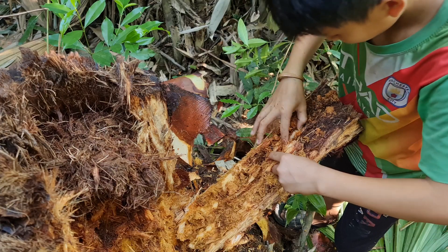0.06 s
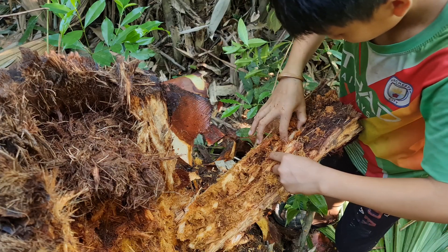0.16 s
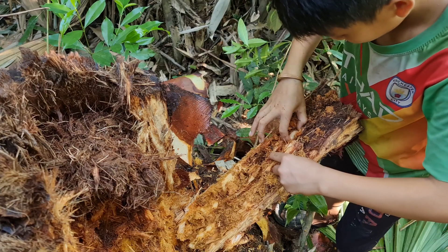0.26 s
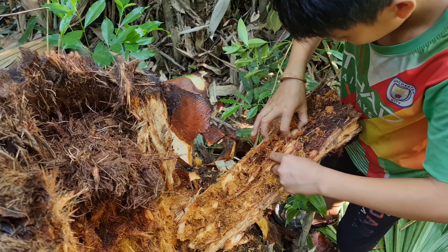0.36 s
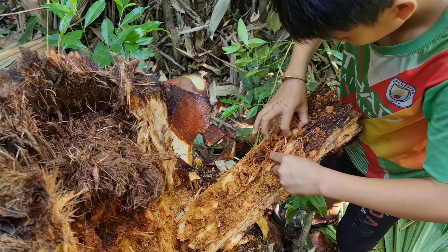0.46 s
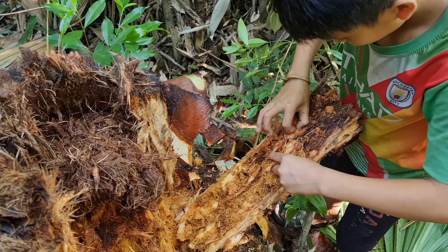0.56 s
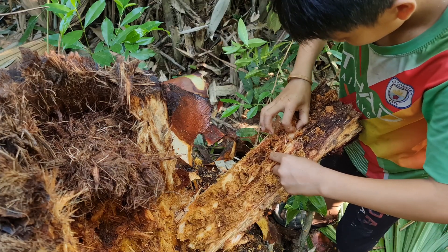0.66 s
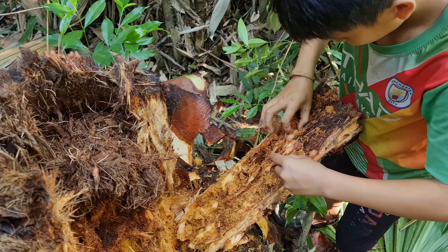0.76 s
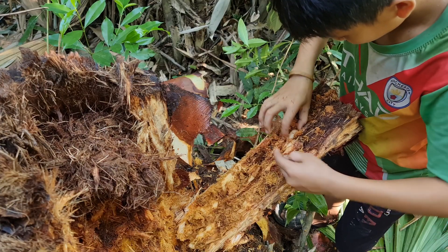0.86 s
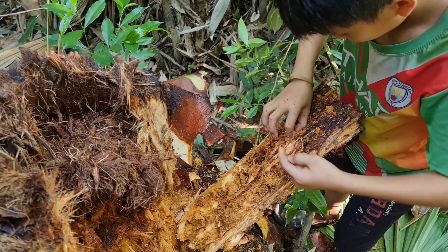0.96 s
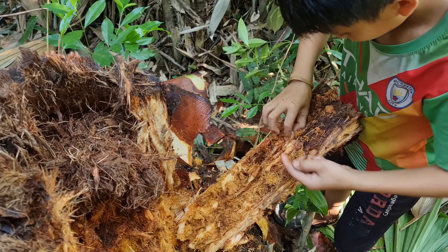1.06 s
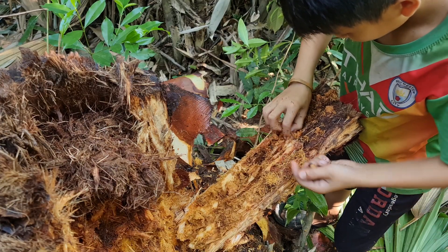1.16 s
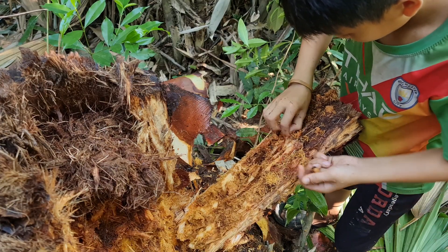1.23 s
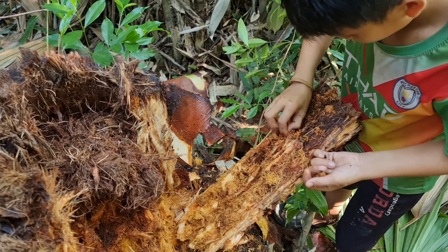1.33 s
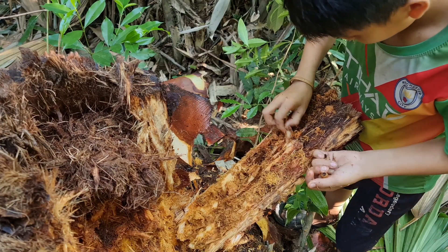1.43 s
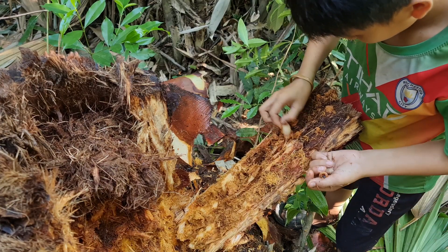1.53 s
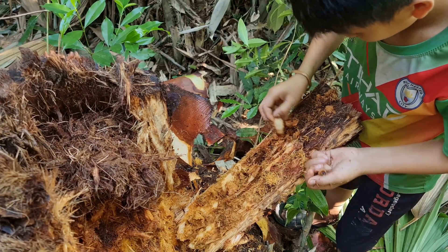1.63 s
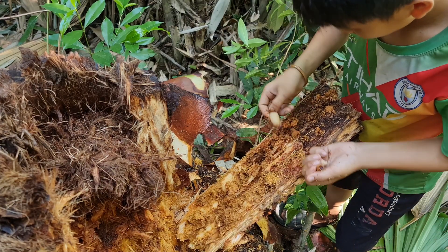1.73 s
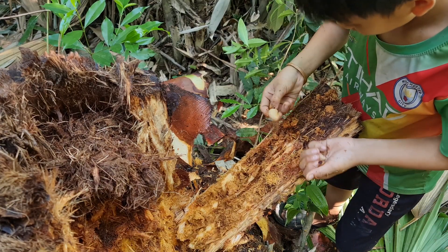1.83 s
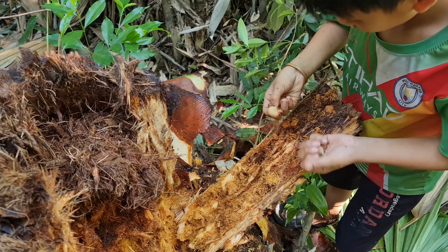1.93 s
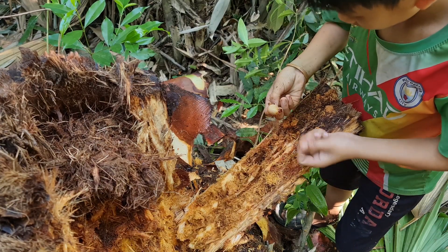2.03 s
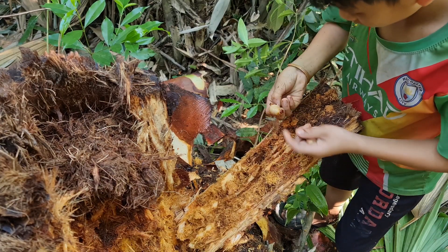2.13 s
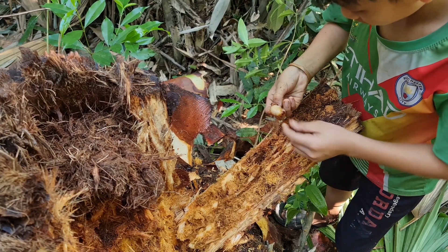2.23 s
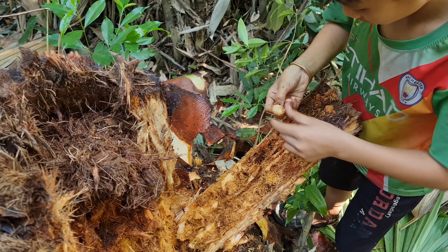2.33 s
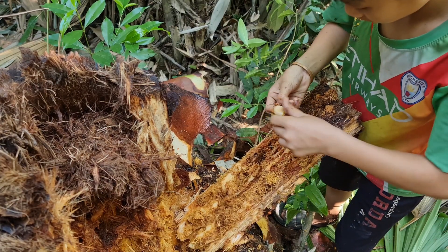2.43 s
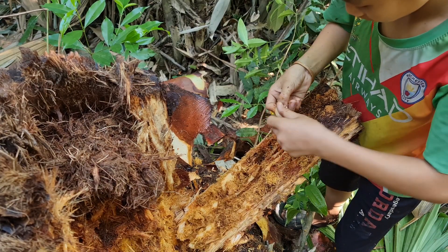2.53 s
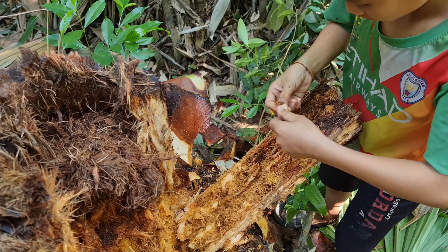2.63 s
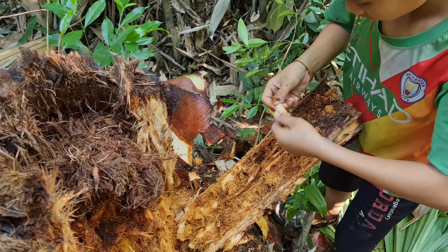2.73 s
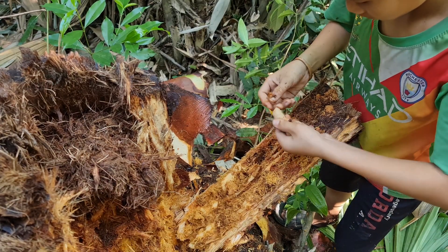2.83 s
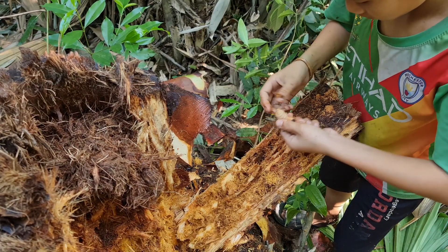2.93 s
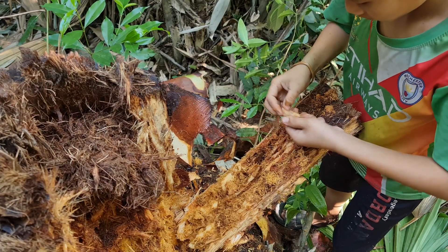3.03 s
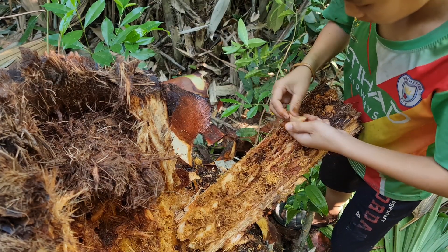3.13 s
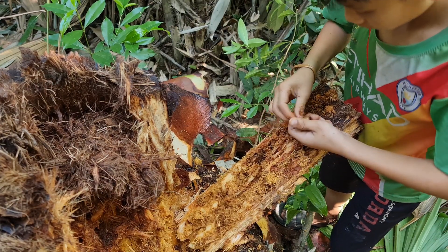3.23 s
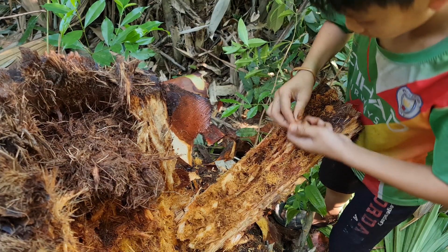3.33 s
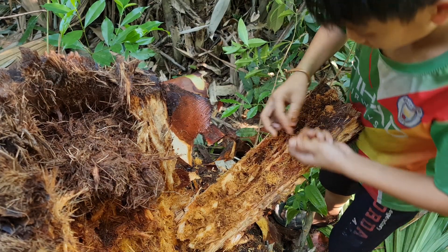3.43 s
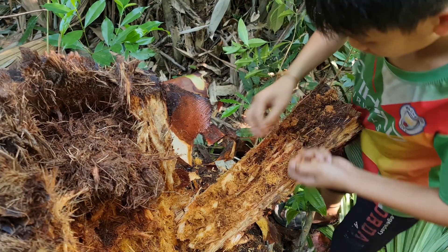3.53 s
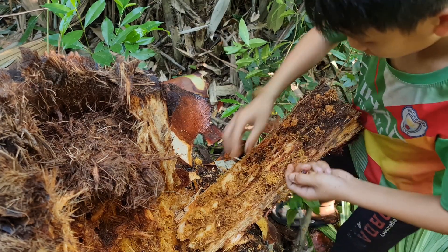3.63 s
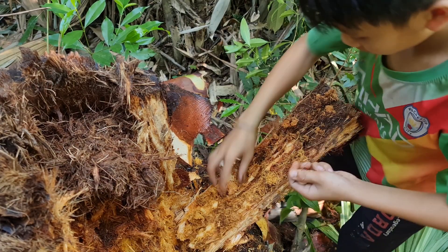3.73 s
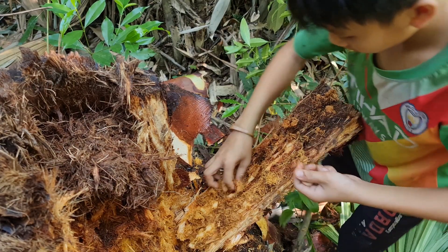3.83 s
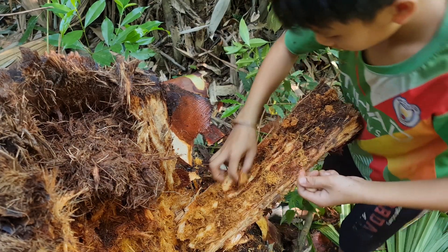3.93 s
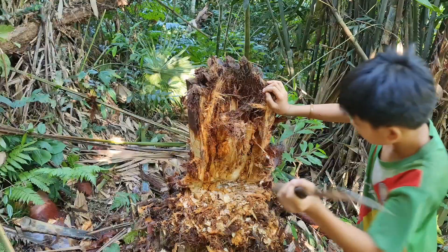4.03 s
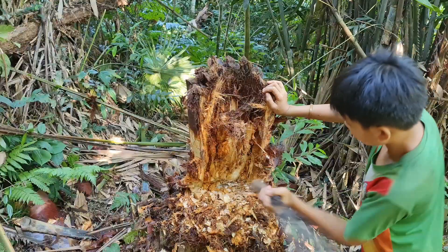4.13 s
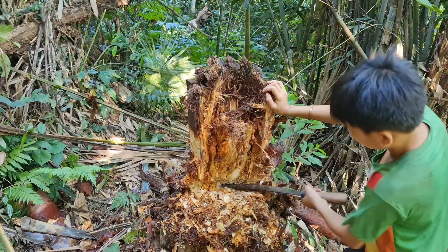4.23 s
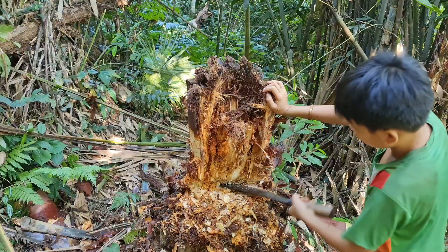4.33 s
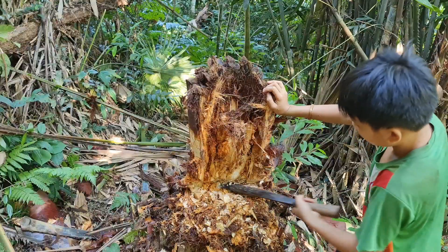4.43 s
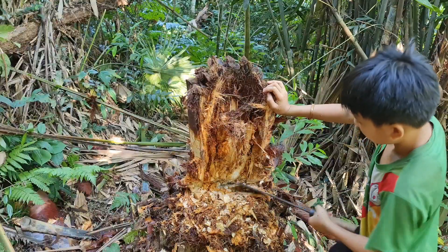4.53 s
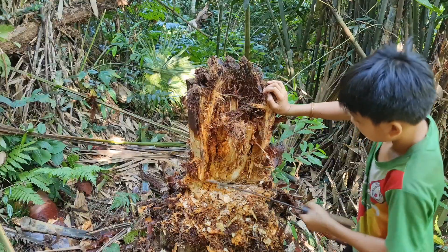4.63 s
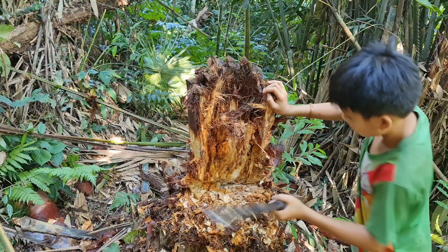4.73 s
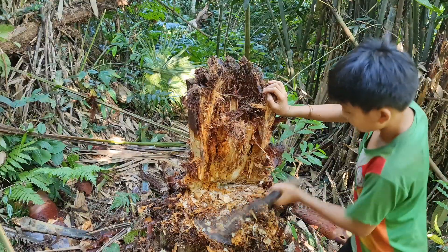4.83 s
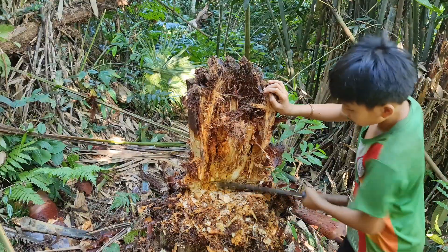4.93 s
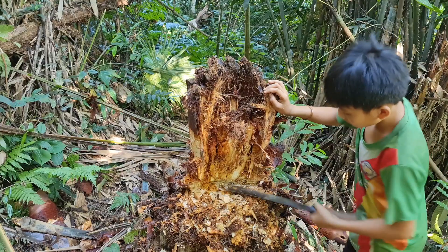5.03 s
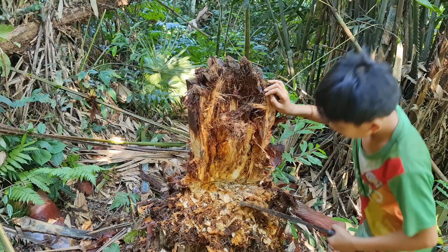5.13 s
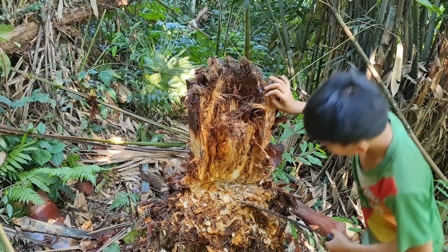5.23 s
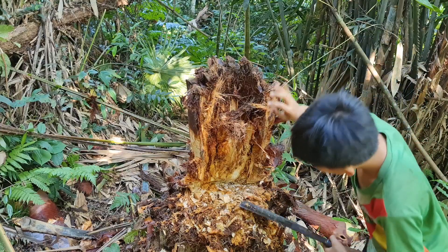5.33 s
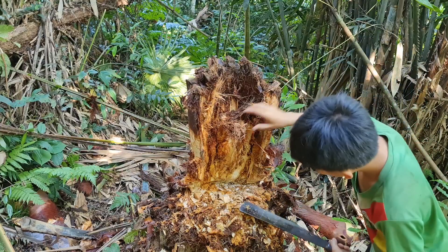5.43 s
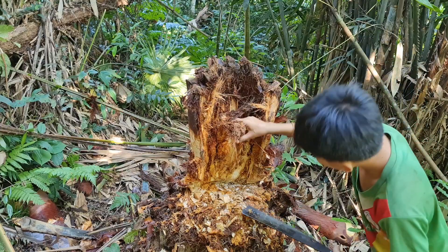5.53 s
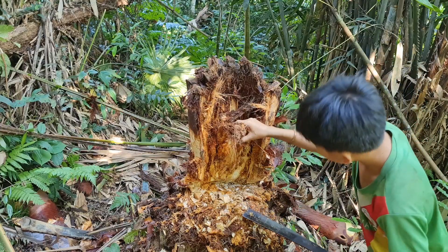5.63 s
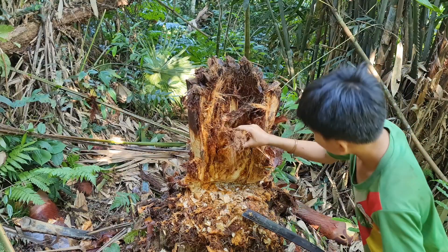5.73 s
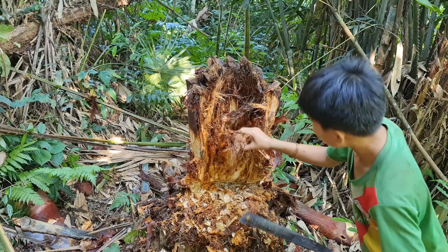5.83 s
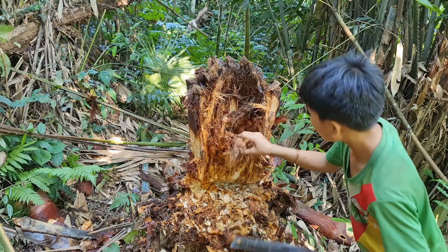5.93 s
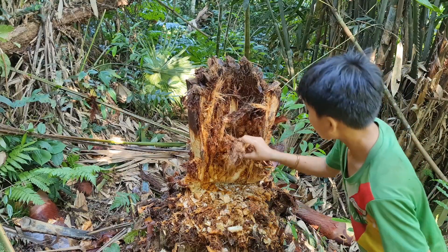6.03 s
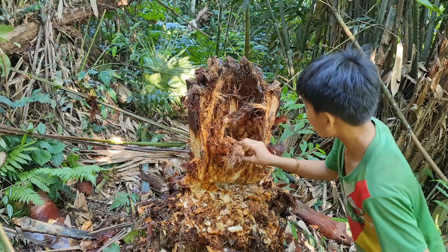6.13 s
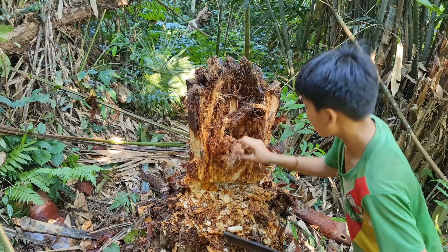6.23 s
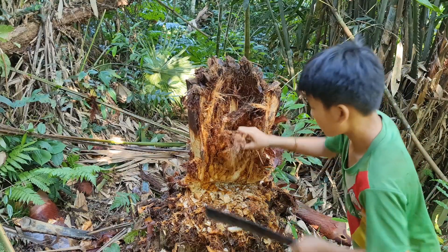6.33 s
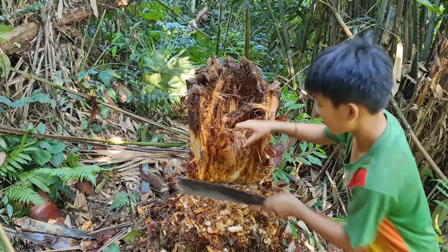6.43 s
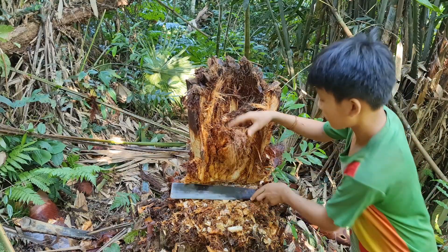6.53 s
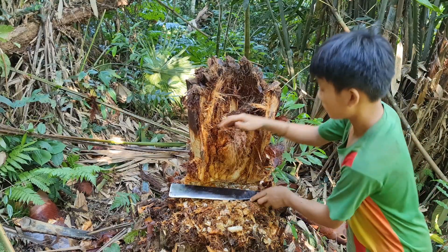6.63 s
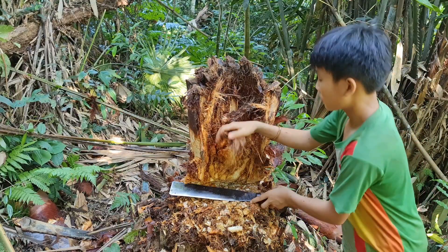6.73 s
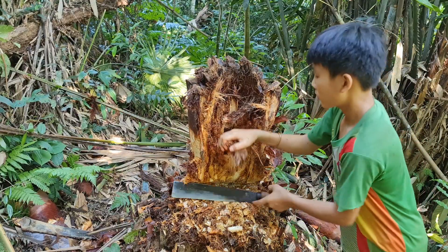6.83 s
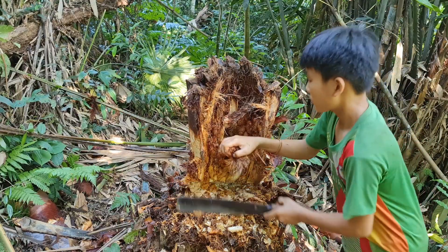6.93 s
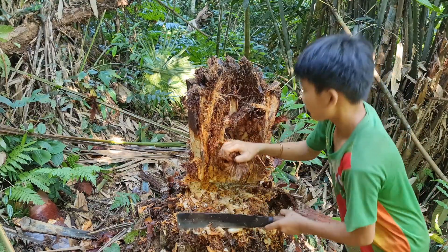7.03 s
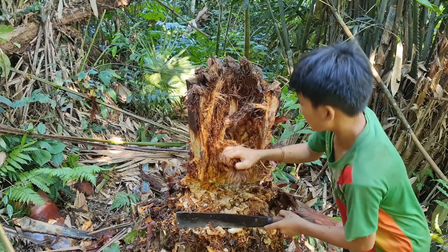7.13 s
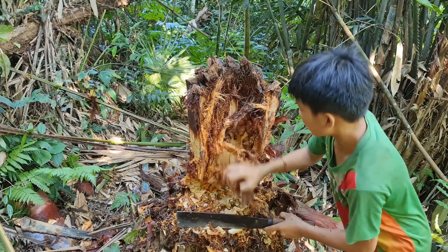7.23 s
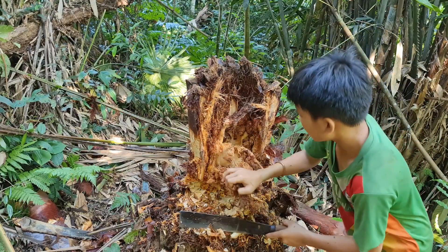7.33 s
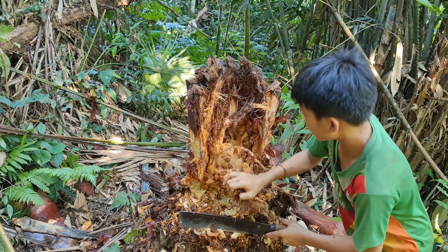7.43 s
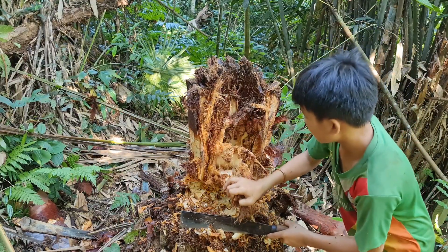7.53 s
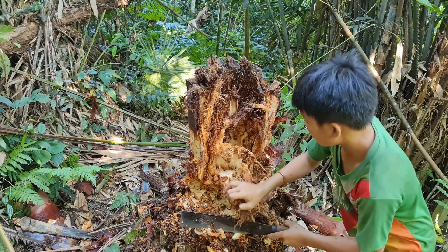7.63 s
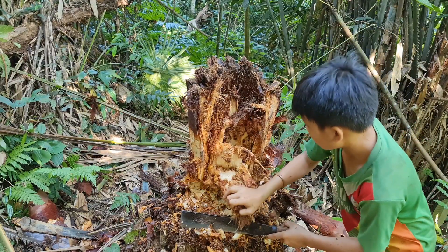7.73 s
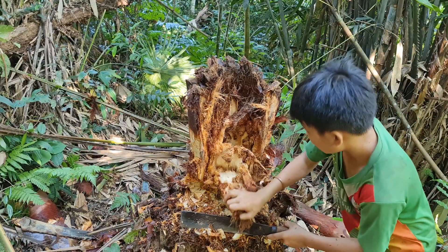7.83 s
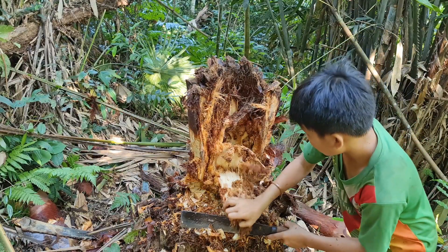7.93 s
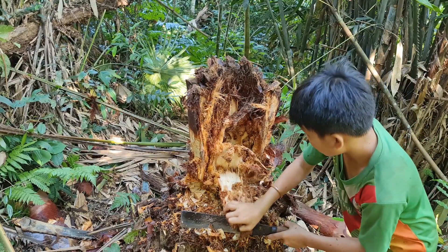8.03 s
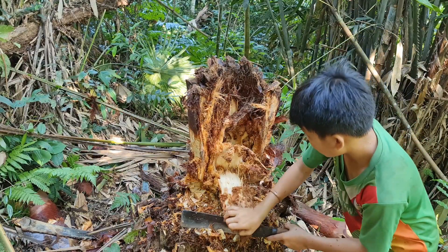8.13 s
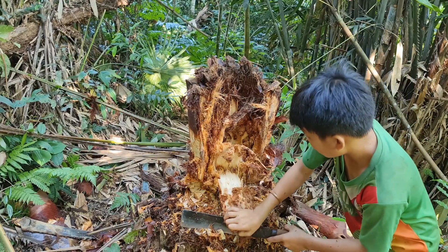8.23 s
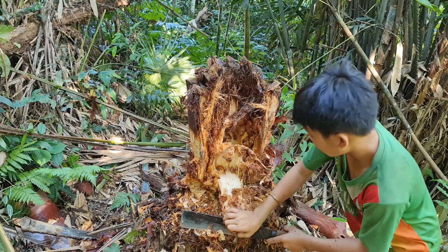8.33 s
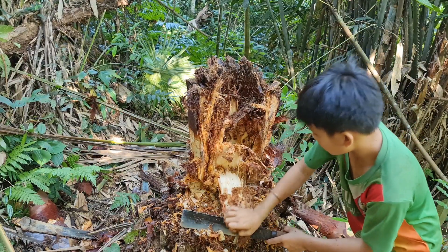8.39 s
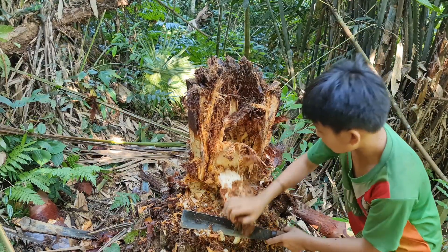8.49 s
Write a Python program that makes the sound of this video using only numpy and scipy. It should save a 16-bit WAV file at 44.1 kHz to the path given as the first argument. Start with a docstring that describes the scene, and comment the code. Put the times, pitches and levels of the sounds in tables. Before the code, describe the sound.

Outdoors in a forest, a steady high insect drone with a fast pulsing rasp. Faint ticks and rustles of fingers in rotten wood come first. The background then shifts abruptly, with a faint low engine far off. A blade chops hard, squeaks briefly and chops again, crumbs falling. Light touches and a small clink follow, then fibres crackle and snap as they are torn out. Close stereo microphone, work slightly right.

```python
"""Tearing a palm trunk open in a humming forest

Insects drone while someone picks at a rotten, fibrous palm trunk: coloured noise, part of it pulsing.
At a second spot a far engine hums (three harmonics) and a bird whistles once (a gliding tone).
A machete chops (a noise burst), squeaks once in the damp wood, chops again, and later clinks
(ringing modes). Then a hand tears pith away: noise grains and bursts crackle and snap, and the
soft wood answers with dull knocks made of dying sine waves."""
import sys
import numpy as np
from scipy import signal
from scipy.fft import rfft, irfft
from scipy.io import wavfile
from scipy.ndimage import uniform_filter1d

SR = 44100
rng = np.random.default_rng(int(sys.argv[2]) if len(sys.argv) > 2 else 0)


def wav_out(sig):
    """Save sig, one row per channel (or a flat mono array), as 16-bit PCM at SR to the path in sys.argv[1]."""
    wavfile.write(sys.argv[1], SR, np.round(np.clip(np.atleast_2d(sig).T, -1, 1) * 32767).astype(np.int16))


N = 377496
T = np.arange(N) / SR  # time, s
FREQS = np.maximum(np.arange(N // 2 + 1) * SR / N, 1)  # Hz, kept above 0 for the logarithm


def undb(db):
    """Turn decibels into a gain."""
    return 10 ** (np.asarray(db) / 20)


def unit(x):
    """Scale to rms 1."""
    return x / np.sqrt(np.mean(x ** 2))


def shape(points):
    """Draw a dB curve over all frequencies through (f/Hz, level/dB) points."""
    hz, db = np.transpose(points)
    return np.interp(np.log(FREQS), np.log(hz), db)


def colour(x, db):
    """Filter with the given dB at every frequency, without sounding ahead of time."""
    cepstrum = irfft(db * np.log(10) / 20, N)
    cepstrum[1:N // 2] *= 2
    cepstrum[N // 2 + 1:] = 0
    response = np.exp(rfft(cepstrum))
    return irfft(rfft(x) * response, N)


def band(x, low_hz, high_hz):
    """Gentle band-pass."""
    edges = [low_hz, min(high_hz, SR / 2 - 100)]
    return signal.sosfilt(signal.butter(2, edges, "band", fs=SR, output="sos"), x)


def add(out, s, x):
    """Mix a short sound in at time s."""
    i = int(s * SR)
    out[..., i:i + x.shape[-1]] += x[..., :N - i]


def walk(rate):
    """Slow random wander with rms 1; rate is new values per second."""
    k = int(SR / rate)
    steps = np.repeat(rng.standard_normal(N // k + 1), k)[:N]
    return unit(uniform_filter1d(steps, k))


def ports(pair, split_hz):
    """Turn two unrelated signals into left and right: alike below split_hz, unlike above."""
    apart = 1 / (1 + (split_hz / FREQS) ** 2) / 2
    mid, side = rfft(pair) * np.sqrt([1 - apart, apart])
    return irfft(np.array([mid + side, mid - side]), N)


def ring(modes, gains, ring_ratio, pitch):
    """A struck thing sounds as several sine waves that die away, each at its own speed."""
    t = T[:SR // 4]
    total = 0
    for (hz, db, t60), gain in zip(modes, gains):
        decay = np.exp(-np.log(1000) * t / (t60 * ring_ratio))
        total = total + gain * undb(db) * np.sin(2 * np.pi * hz * pitch * t) * decay
    return total


def swell(start_s, length_s, attack_s, release_s):
    """Loudness curve that builds up, holds and dies away."""
    early, late = np.maximum(start_s - T, 0), np.maximum(T - start_s - length_s, 0)
    return np.exp(-np.minimum(early / attack_s + late / release_s, 20))


# Tone of the forest air at the first and second spot: f/Hz, relative level/dB per Hz
FIRST_AIR = [(20, -27), (50, -1.5), (100, -12), (160, -25), (330, -14.5), (700, -7.5), (950, -16),
             (1300, -15.5), (2200, -23), (3700, -26.5), (6300, -29), (8500, -25), (10500, -27),
             (16000, -28)]
SECOND_AIR = [(20, -12), (48, 2), (100, 0), (170, -16.5), (330, -10), (600, -3), (900, -14), (1250, -11.5),
              (2200, -19.5), (3700, -22.5), (6300, -23.5), (8500, -23), (10500, -28.5), (16000, -37.5)]


def air(spectrum, db, sway_db):
    """Soft wash of far leaves and rumble: coloured noise with a swaying level."""
    level = undb(db + sway_db * walk(1.9))
    wash = ports(colour(rng.standard_normal((2, N)), shape(spectrum)), split_hz=53)
    return level * unit(wash)


# Tone of the insect song at the first and second spot: f/Hz, relative level/dB per Hz
FIRST_SONG = [(3900, -58), (4250, -16), (4500, 0), (4950, 5), (5300, 2.5), (5550, -9.5), (6100, -43),
              (6900, -23), (7350, -16), (8000, -44)]
SECOND_SONG = [(4000, -40.5), (4450, -19.5), (4800, -4.5), (5050, -1.5), (5300, -2.5), (5550, -14),
               (6100, -32.5), (6900, -23.5), (7450, -19), (8000, -28)]


def insects(song, chorus_db, caller_db, pulse_hz, pan_db, stroke):
    """A far chorus blurs into a band; a nearer insect pulses with its wing strokes, each sounding much the
    same."""
    left_right = np.array([[pan_db], [-pan_db]])
    phase = np.cumsum(pulse_hz * (1 + .006 * walk(4))) / SR % 1
    strokes = unit(np.exp(-((phase - .5) / stroke) ** 2 / 2))  # stroke: width as a share of a cycle
    rasp = rng.standard_normal((2, N))
    repeated = rasp[:, np.round(phase * SR / pulse_hz).astype(int)]
    # the fresh half-strength rasp makes each stroke a little different
    caller = strokes * unit(repeated + rasp / 2) * undb(caller_db + left_right / 2)
    chorus = rng.standard_normal((2, N)) * undb(.3 * walk(2) - left_right / 40)
    db = shape(song)
    return undb(chorus_db) * colour(chorus + caller, db) / np.sqrt(np.mean(undb(db) ** 2))


def high_insect(start_s=2.86, hz=7450, width_hz=480, db=-81):
    """A thinner, higher voice, a narrow band of noise, joins the chorus and holds its note."""
    voice = band(rng.standard_normal((2, N)), hz - width_hz / 2, hz + width_hz / 2)
    return undb(db) * unit(voice) * np.clip((T - start_s) / .2, 0, 1)


# Far engine: t/s, firing rate f/Hz, relative level/dB
ENGINE_PATH = [(3.98, 45.5, -65.5), (4.4, 46.02, -63.5), (5, 47.57, -63), (5.8, 48.3, -65),
               (6.5, 48.4, -66.5), (7.2, 48.6, -72), (8.56, 48.58, -84)]


def engine(gain_db=-1, second_db=-4, third_db=-25):
    """Only the three lowest firing harmonics carry through the trees."""
    seconds, firing_hz, level_db = np.transpose(ENGINE_PATH)
    hz = np.interp(T, seconds, firing_hz)
    db = np.interp(T, seconds, level_db)
    turn = 2 * np.pi * np.cumsum(hz * (1 + 0.0097 * walk(6.7))) / SR
    hum = np.cos(turn) + undb(second_db) * np.cos(2 * turn) + undb(third_db) * np.cos(3 * turn)
    return unit(hum) * undb(gain_db + db + 1.1 * walk(12))


def bird(from_hz=4480, to_hz=3880, db=-80.5, flutter_db=-1.0):
    """One far, falling whistle that flattens out, blurred by the trees."""
    u = np.clip((T - 5.08) / .7, 0, 1)  # starts at 5.08 s, lasts 0.7 s
    glide = (1 - u) ** 1.5
    hz = to_hz + (from_hz - to_hz) * glide + 45 * walk(200)
    loudness = undb(db + flutter_db * walk(24.91)) * np.sqrt(np.abs(np.sin(np.pi * u)))
    return loudness * np.sin(2 * np.pi * np.cumsum(hz) / SR)


def forest(x, near_db=-15, near_t60=0.057, far_db=-35, far_t60=0.54):
    """Ground and stems close by scatter sound at once; the trees beyond leave a faint tail."""
    t = T[:SR]
    near, far = rng.standard_normal((2, 2, SR)) * (t > .001)
    near = band(near, 200, 14000) * np.exp(-np.log(1000) * t / near_t60)
    far = band(far, 900, 3500) * np.exp(-np.log(1000) * t / far_t60)
    echo = (undb(near_db) * unit(near) + undb(far_db) * unit(far)) / np.sqrt(SR)
    return x + signal.fftconvolve(np.broadcast_to(x, (2, N)), echo, axes=1)[:, :N]


def sided(x, hz=350, width_hz=110, shade_db=-6):
    """The trunk throws its low-middle tones more to the right: the left has a dip there."""
    dip = undb(shade_db * np.exp(-((FREQS - hz) / width_hz) ** 2))
    return np.array([irfft(rfft(x) * dip, N), x])


def chips(hz=2300, spread_octaves=0.65, cycles=7, size_db=3, count=5000):
    """A stream of dry chips, each ticking with its own brief pitch."""
    out, t = np.zeros((2, N)), T[:SR // 50]
    times = rng.uniform(0, T[-1], count)
    for s, (tone, size, pan) in zip(times, rng.standard_normal((count, 3))):
        chip_hz = min(hz * 2 ** (spread_octaves * tone), SR / 3)
        tick = np.sin(2 * np.pi * chip_hz * t) * np.exp(-t * chip_hz / cycles)
        add(out, s, undb(size_db * size + 2 * pan * np.array([[1], [-1]])) * tick)
    return unit(out)


def debris(delay_s=0.017, db=-51, fall_s=.028, settle_db=-70, settle_s=0.082):
    """Loudness of the crumbs: a shower falls after each chop, and the last ones trickle slowly."""
    level = np.zeros(N)
    for _, stuck_s, _, _ in CHOP_CUTS:
        level += undb(db) * swell(stuck_s + delay_s, 0, delay_s / 2, fall_s)
        level += undb(settle_db) * swell(stuck_s + delay_s, 0, delay_s / 2, settle_s)
    return level


# Tone of the loose pith: f/Hz, relative level/dB per Hz
PITH_TONE = [(120, -11.5), (260, 3), (500, -3), (1000, -6), (1900, -3.5), (4000, -3), (7000, -2),
             (11000, -7), (16000, -16.5)]
# Strokes of a hand or the blade over loose pith:
# t/s at the height, relative level/dB, half length t/s, body level/dB, treble level/dB
BRUSH_STROKES = [(0.453, -78, 0.11, -11, 1), (2.23, -76.5, 0.075, -16, -12), (2.58, -77.5, 0.068, -10, 0),
                 (3.593, -78.5, 0.087, 19, 7), (3.775, -62.5, 0.095, -2.5, -2),
                 (4.603, -60, 0.029, -13.5, -4), (5.129, -62, 0.033, -6, -12.5)]


def brushing(body_hz=900, treble_hz=4500, debris_body_db=-2, debris_treble_db=-3, chips_db=-6):
    """Loose fibres rub, catch and tick under a moving hand or blade, or as they fall."""
    grains = rng.standard_normal((2, N))
    catches_db = 3.6 * np.minimum(rng.exponential(size=N), 6.5) + 2.8 * walk(110)
    rubbing = unit(ports(colour(grains * undb(catches_db), shape(PITH_TONE)), split_hz=1800))
    rustle = unit(rubbing + undb(chips_db) * chips())
    body, middle = band(rustle, 210, body_hz), band(rustle, body_hz, treble_hz)
    top = band(rustle, treble_hz, 19000)

    def tinted(body_db, treble_db):
        """Rebalance the three bands of the rustle."""
        return middle - undb(body_db) * body - undb(treble_db) * top

    out = debris() * tinted(debris_body_db, debris_treble_db)
    for s, db, half_s, body_db, treble_db in BRUSH_STROKES:
        stroke = np.exp(-np.minimum(((T - s) / half_s) ** 2 / 2, 20))
        out += undb(db) * stroke * tinted(body_db, treble_db)
    return out


# Squeak of the wedged blade: t/s, level/dB
SQUEAK = [(4.376, -52)]


def creak(half_s=0.011, hz=650, rise_hz=110, third_db=-19):
    """The wedged blade gives one short squeak in the damp wood, its pitch rising in the second half."""
    s, db = SQUEAK[0]
    u = np.clip((T - s) / half_s, -6, 6)
    turn = 2 * np.pi * np.cumsum(hz + rise_hz * np.maximum(u, 0) + 30 * walk(450)) / SR
    return undb(db) * np.exp(-u ** 2 / 2) * (np.sin(turn) + undb(third_db) * np.sin(3 * turn))


# Ringing of the blade: f/Hz, relative level/dB, time to fall 60 dB t/s (before the ring ratio)
BLADE_MODES = [(2100, -4, 0.055), (2843, 3, 0.035), (5110, -18, .03), (6860, -11, 0.05), (7620, -8, 0.064),
               (8500, -17, 0.055), (10840, -21, 0.11)]
# Contacts that ring the blade: t/s, ring level/dB, scrape level/dB
BLADE_TAPS = [(4.2325, -33.5, -51.5), (6.4989, -49, -59), (6.533, -63, -52.5), (6.5424, -51.5, -50)]


def blade(scrape_s=0.0076):
    """The steel scrapes and rings briefly, damped by the hand; each contact favours other modes."""
    out, t = np.zeros((2, N)), T[:SR // 10]
    for s, db, scrape_db in BLADE_TAPS:
        favour = undb(2 * rng.standard_normal(len(BLADE_MODES)))
        add(out, s, undb(db) * ring(BLADE_MODES, favour, 0.97, 1))
        scrape = unit(band(rng.standard_normal((2, len(t))), 595, 9700))
        add(out, s, undb(scrape_db) * np.exp(-t / scrape_s) * scrape)
    return out


# Machete cutting through fibres: t/s of entry, t/s when it sticks, level/dB, growth of the bite/dB
CHOP_CUTS = [(4.232, 4.2334, -15, 1.5), (4.889, 4.8979, -20, 15.5)]
# Tone of the cut: f/Hz, relative level/dB per Hz
CUT_TONE = [(150, -28.5), (400, -12.5), (750, 8), (950, -9.5), (1170, 1), (1500, -8.5), (1900, -7),
            (2850, -5.5), (3500, -14), (5100, -13.5), (6800, -16), (8700, -28), (10700, -23), (16000, -32)]


def chops(grain_db=3, stop_s=0.0036, crumble_db=-22, crumble_s=0.017):
    """The blade shears ever more fibres until the wood stops it; crumbs settle after."""
    force = np.zeros(N)
    for entry_s, stuck_s, db, growth_db in CHOP_CUTS:
        after = np.maximum(T - stuck_s, 0)
        bite_s = [entry_s - .003, entry_s, stuck_s]
        bite_db = [db - growth_db - 34.5, db - growth_db, db]
        bite = undb(np.interp(T, bite_s, bite_db, left=-200))
        force += bite * (np.exp(-after / stop_s) + undb(crumble_db) * np.exp(-after / crumble_s))
    fibres = rng.standard_normal((2, N)) * undb(grain_db * rng.standard_normal(N))
    db = shape(CUT_TONE)
    cut = colour(unit(fibres) * force, db) / np.sqrt(np.mean(undb(db) ** 2))
    return ports(cut, split_hz=13000)


# Ringing of the soft trunk, before each knock's pitch and ring ratios:
# f/Hz, relative level/dB, time to fall 60 dB t/s
TRUNK_MODES = [(72.6, -13, 0.56), (191, -12, 0.22), (354, -6.5, 0.16), (445, 5.5, 0.059),
               (629, -0.5, 0.071), (710, -2.5, 0.025), (1230, -11, 0.043), (1835, -25.5, 0.022),
               (2850, -19.5, .03)]
# Blows and light touches: t/s, relative level/dB, pitch ratio, ring ratio, bass level/dB
TRUNK_BLOWS = [(2.503, -54, 2.9, 0.52, -33), (4.2346, -20, 2.47, 0.49, -8.5),
               (4.2385, -13.5, 0.94, 0.56, 0), (4.8918, -21.5, 1, 0.26, -8),
               (4.8984, -10.5, 1.12, 0.33, -12), (5.137, -52, 2.9, 0.49, -35),
               (6.049, -57, 2.5, 0.41, -34.5), (6.201, -51, 3, .45, -35), (6.497, -40.5, 1.07, 0.43, -7),
               (6.5003, -33, 1.01, 0.38, -7.5), (7.104, -39, 2.06, 0.43, -35), (7.171, -40, 1.1, 1.2, -26),
               (7.213, -36.5, 1.2, 1.3, -14), (7.256, -33.5, 1, 0.54, -29), (7.472, -36.5, 1.0, 0.73, -35),
               (7.867, -38, 1.4, .7, -41), (7.902, -35, 2.3, 0.82, -36), (8.105, -36, 2.06, 0.41, -20),
               (8.142, -30.5, 1.77, 0.46, -33)]


def knocks(contact_s=0.00056, bass_hz=400):
    """Each blow rings the trunk; light ones hardly move its lowest modes."""
    out = np.zeros(N)
    push = signal.windows.hann(int(contact_s * SR) + 3)  # the soft contact rounds off the blow
    low_share = 1 / (1 + (np.array(TRUNK_MODES)[:, 0] / bass_hz) ** 4)
    signs = (-1) ** (np.arange(len(TRUNK_MODES)) // 2)
    # friction between the fibres stops the last small swings early
    friction = np.exp(-(T[:SR // 4] / .028) ** 2)
    for s, db, pitch, ring_ratio, bass_db in TRUNK_BLOWS:
        thud = friction * ring(TRUNK_MODES, signs * undb(bass_db * low_share), ring_ratio, pitch)
        add(out, s, undb(db) * np.convolve(thud, push / push.sum()))
    return out


def shudder(jolt, jolts_per_s=500, pitch=1.124, ring_ratio=0.29, low_hz=430, high_hz=3000):
    """Tearing pith tugs at the trunk in many tiny jolts that keep its modes ringing."""
    tugs = rng.standard_normal(N) * (rng.random(N) < jolts_per_s / SR)
    wood = ring(TRUNK_MODES, (-1) ** np.arange(len(TRUNK_MODES)), ring_ratio, pitch)
    wood = band(band(wood, low_hz, high_hz), low_hz, high_hz)
    return signal.fftconvolve(unit(tugs) * jolt, wood / np.linalg.norm(wood))[:N]


# Pulls of the hand that tear the pith:
# t/s when it starts to give, length t/s, relative level/dB, build-up t/s, jolt to the trunk/dB
HAND_PULLS = [(6.949, 0.26, -73.5, .1, -1.5), (7.19, 0.069, -39, 0.012, -7),
              (7.445, 0.052, -58, 0.0054, -13), (7.576, 0.14, -66.5, 0.027, -11),
              (7.874, 0.058, -48, 0.026, -23), (8.052, 0.07, -57.5, 0.15, -15)]


def pull(release_s=.018):
    """How hard the hand tears, and how hard that jolts the trunk."""
    efforts = np.array([undb(db) * swell(s, length_s, build_s, release_s)
                        for s, length_s, db, build_s, _ in HAND_PULLS])
    jolt_gains = undb(np.array(HAND_PULLS)[:, 4])
    return efforts.sum(axis=0), jolt_gains @ efforts


def small_snaps(effort, gap_s=.014, over_db=36, top_db=-15, scatter_db=3, tint_db=5, body_db=-4,
                count=120):
    """Thin fibres break at uneven moments from the first pull on, louder with the effort."""
    rows = []
    chance = rng.standard_normal((count, 4))
    for k, (late, size, body, treble) in enumerate(chance):
        s = min(HAND_PULLS[0][0] + gap_s * (k + late / 2), T[-1])
        db = min(over_db + 20 * np.log10(effort[int(s * SR)]), top_db)
        rows.append((s, db + scatter_db * size, body_db + tint_db * body, tint_db * treble))
    return rows


# Single snaps, ticks and soft scuffs, from faint to loud:
# t/s, relative level/dB, body level/dB, treble level/dB
SINGLE_TICKS = [(0.3057, -29, -11, -16), (0.5753, -36, -12, 7), (1.8047, -45.5, 2, 18),
                (3.513, -41.5, 28, -8), (3.539, -37.5, 21.5, -4), (3.943, -30.5, 6, 3),
                (4.99, -23.5, -9, 6.5), (6.8713, -24, 9.5, -6.5), (7.034, -21.5, 7, -11),
                (7.104, -24.5, 6, -5), (7.152, -19, 11, -4), (7.1892, -0.5, -9, -7),
                (7.1987, -1.5, -11, 2.5), (7.2196, -8, 3, 0), (7.239, -5, 7, -1), (7.2872, -4.5, -2, -0.5),
                (7.357, -28.5, -18, 8), (7.4283, -15, -17.5, -7), (7.4431, -15, -12, 4),
                (7.447, -6.5, -9, -8), (7.4986, -13.5, 9, 5.5), (7.5312, -7.5, -5, -6),
                (7.5687, -2, -21, -12), (7.5751, -9, -12, -6), (7.586, -4, -10, -11),
                (7.5994, -8.5, -20, -5), (7.6115, -23.5, -18, 17), (7.6261, -7.5, -19, -1),
                (7.6327, -3.5, -2.5, -1), (7.6436, -15, 12.5, 9), (7.659, -9.5, -6, 3.5),
                (7.6828, -18.5, -14, 6), (7.6982, -11.5, -3, -1), (7.705, -8, 0.5, -4),
                (7.7704, -18, -11, 7.5), (7.774, -10.5, -10, -17), (7.8085, -15, 8.5, -17),
                (7.8366, -20, 8, 6), (7.8663, -5.5, 13, -9), (7.8912, -9, -8, 5.5), (7.8962, -3.5, -6, -18),
                (7.9015, -1.5, 7.5, -4), (7.9095, -8.5, -16, 6), (7.9262, -6.5, -17, -2),
                (7.9595, -12, -8, -14), (8.0298, -19, 2, 1), (8.055, -6.5, 1.5, -7), (8.077, -5.5, -6, -3),
                (8.092, -9.5, -10, 5.5), (8.1045, -7.5, 2, -4), (8.1421, -10.5, 12.5, 3.5),
                (8.153, -6.5, -7, -16.5), (8.2624, -17.5, 0, -3), (8.3535, -16, -9, -13.5)]


def snaps(effort, gain_db=2, onset_s=0.00031, break_s=0.00089, splinter_db=-17, splinter_s=0.0082):
    """A fibre breaks in about a millisecond, then splinters; body and treble differ each time."""
    body, crack, treble = parts = np.zeros((3, 2, N))
    t = T[:SR // 40] - 1 / 200  # the break is at t = 0
    after = np.maximum(t, 0)
    fall = np.exp(-after / break_s) + undb(splinter_db) * np.exp(-after / splinter_s)
    breaking = np.exp(np.minimum(t, 0) / onset_s) * fall
    for s, db, body_db, treble_db in small_snaps(effort) + list(SINGLE_TICKS):
        burst = rng.standard_normal((2, len(t))) * breaking
        burst /= np.sqrt(np.sum(burst ** 2, axis=1, keepdims=True))
        for part, tint_db in zip(parts, (body_db, 0, treble_db)):
            add(part, s + t[0], undb(gain_db + db + tint_db) * burst)
    return band(body, 350, 1350) - band(crack, 1290, 4670) + band(treble, 5860, 13600)


def fraying(db=-47, before_s=.004, after_s=0.006):
    """Fine fibres fray just before and after each single tick, in proportion to its strength."""
    out, t = np.zeros(N), T[:SR // 10] - 1 / 20
    halo = np.exp(np.minimum(t / before_s, -t / after_s))
    for s, tick_db, _, _ in SINGLE_TICKS:
        add(out, s + t[0], undb(db + tick_db) * halo)
    return out


def tearing(effort, grains_per_s=7000, spread_db=3.0, gain_db=11.5, dull_hz=6000, treble_db=-3):
    """Countless fine fibres give way, in uneven spurts: random grains that follow the effort."""
    sizes = undb(spread_db * np.minimum(rng.exponential(size=N), 5))
    sizes = sizes * (rng.random(N) < grains_per_s / SR)
    grains = unit(sizes * rng.standard_normal((2, N)))
    strength = np.hypot(effort, fraying()) * undb(gain_db + 2 * walk(130))
    return colour(grains * strength, shape([(700, 3), (2000, 0), (dull_hz, treble_db)]))


# Tone of the breaking fibres: f/Hz, relative level/dB per Hz
FIBRE_TONE = [(150, -31), (250, -33.5), (348, -33), (393, -32.5), (476, -15), (607, -12), (761, -19),
              (1080, -12.5), (2320, -12), (2910, -8), (3650, -11.5), (5440, -8), (8550, -17),
              (14700, -16.5), (16000, -15)]
# Resonances of the torn splinters: f/Hz, width f/Hz, boost level/dB
SPLINTER_PEAKS = [(580, 160, 3), (1080, 160, 2), (2900, 400, 2), (3940, 400, 1.5), (6490, 600, 2)]


def torn_fibres(effort):
    """Snaps and tearing share the tone of the fibres, with peaks where torn splinters resonate."""
    wood_db = shape(FIBRE_TONE)
    for hz, width_hz, db in SPLINTER_PEAKS:
        wood_db = wood_db + db / (1 + (2 * (FREQS - hz) / width_hz) ** 2)
    return ports(colour(snaps(effort) + tearing(effort), wood_db), split_hz=4800)


def scene(move_s=3.972):
    """Work on the trunk, a little to the right, inside the drone of first one spot, then another."""
    effort, jolt = pull()
    fibres = torn_fibres(effort) + chops()
    trunk = sided(knocks() + shudder(jolt) + creak())
    work = forest(fibres + trunk) + blade() + brushing()
    left_caller = dict(caller_db=-5.5, pulse_hz=29.6, pan_db=7, stroke=.11)
    right_caller = dict(caller_db=-9.5, pulse_hz=21.4, pan_db=-8, stroke=.07)
    first = insects(FIRST_SONG, chorus_db=-61.5, **left_caller)
    first = first + air(FIRST_AIR, db=-68.5, sway_db=-0.13)
    second = insects(SECOND_SONG, chorus_db=-65.0, **right_caller)
    second = second + air(SECOND_AIR, db=-67.5, sway_db=-1.5) + engine() + bird()
    background = high_insect() + np.where(T < move_s, first, second)
    return work * undb(np.array([[-.7], [.7]])) + background


def record(dry):
    """Nothing sounds above about 16 kHz: a steep low-pass."""
    return signal.sosfilt(signal.ellip(10, .2, 70, 15950, fs=SR, output="sos"), dry)


dry = scene()
out = record(dry)
wav_out(out)
```